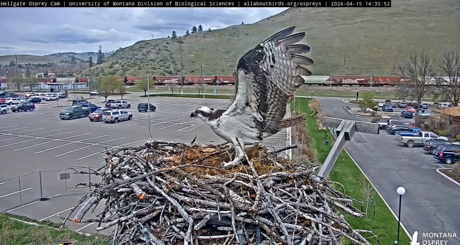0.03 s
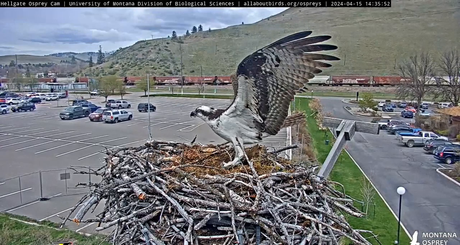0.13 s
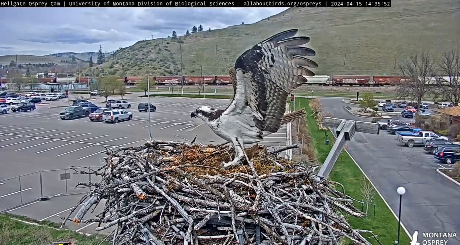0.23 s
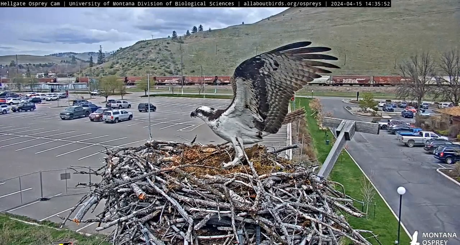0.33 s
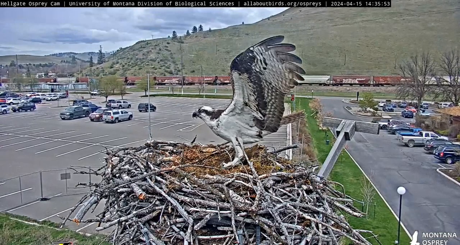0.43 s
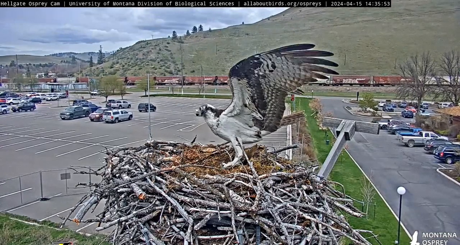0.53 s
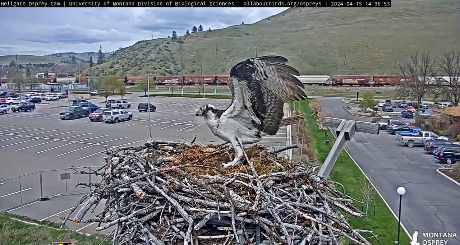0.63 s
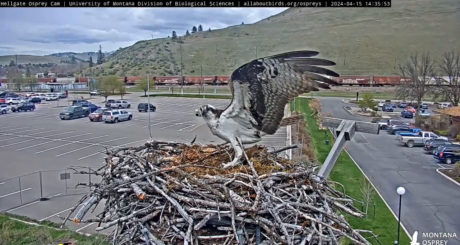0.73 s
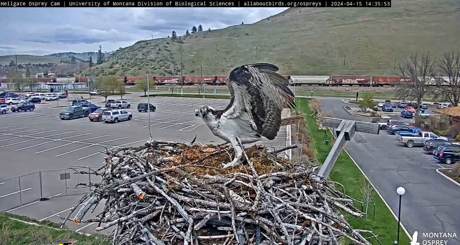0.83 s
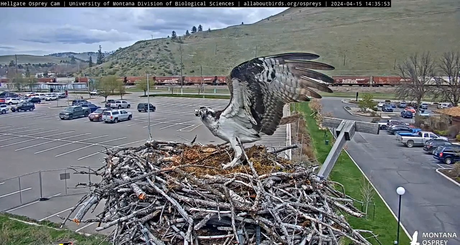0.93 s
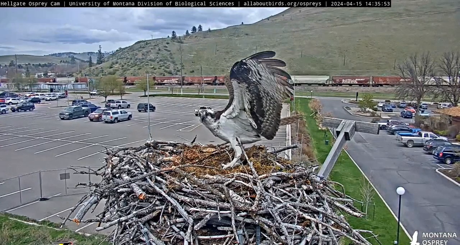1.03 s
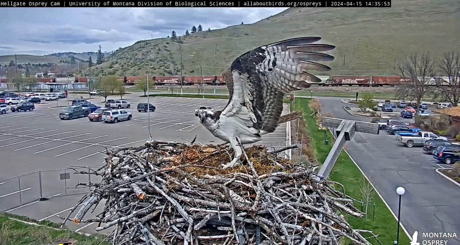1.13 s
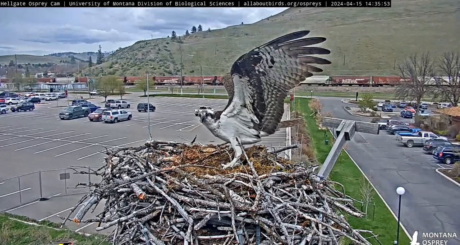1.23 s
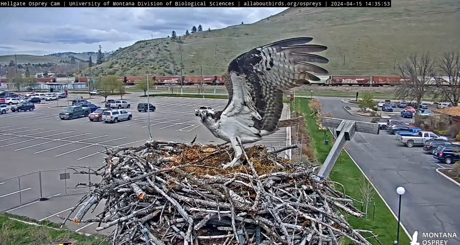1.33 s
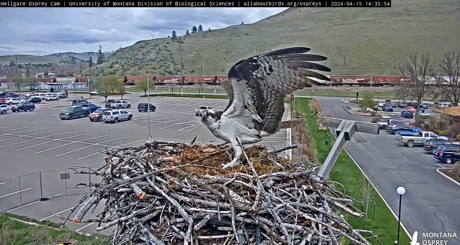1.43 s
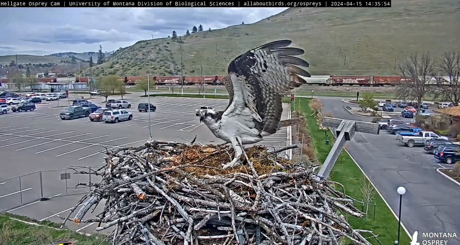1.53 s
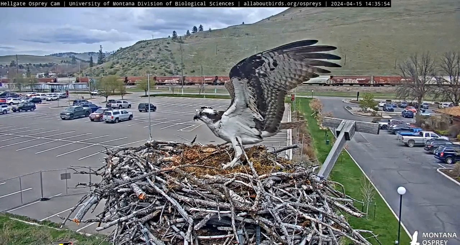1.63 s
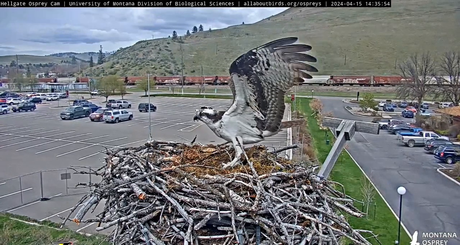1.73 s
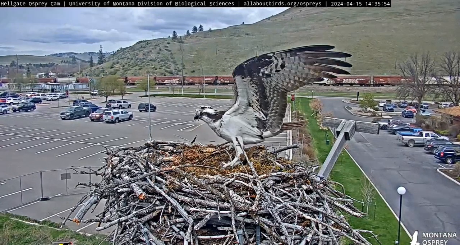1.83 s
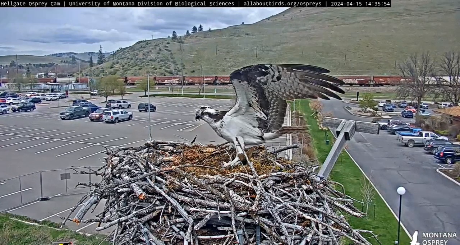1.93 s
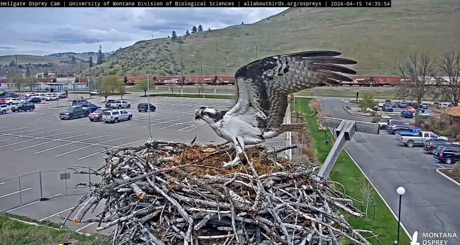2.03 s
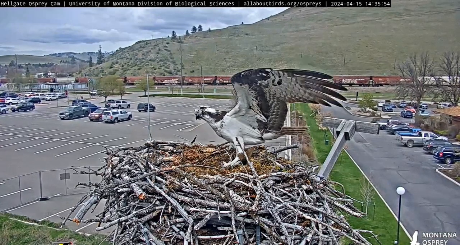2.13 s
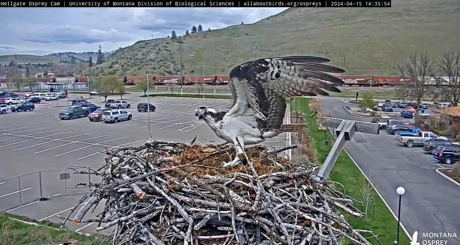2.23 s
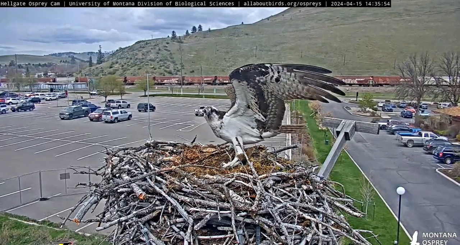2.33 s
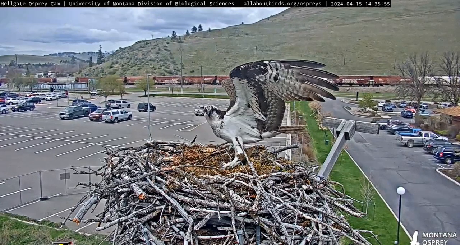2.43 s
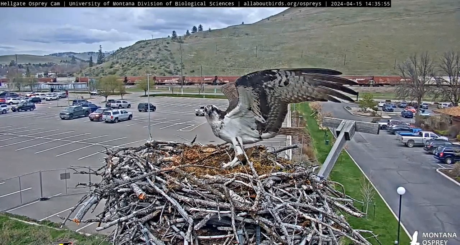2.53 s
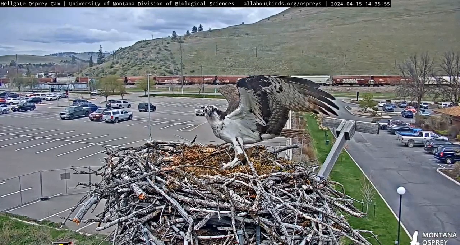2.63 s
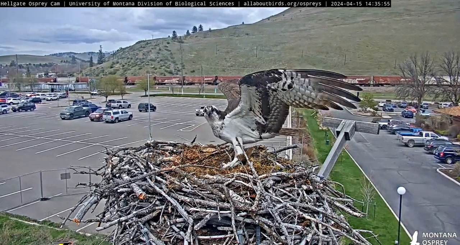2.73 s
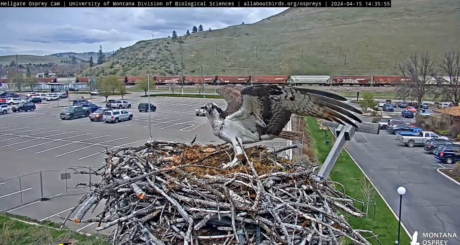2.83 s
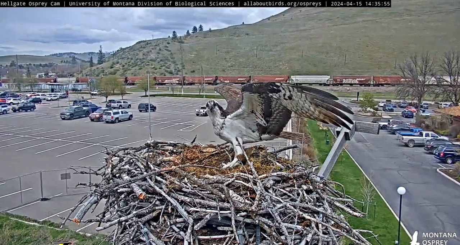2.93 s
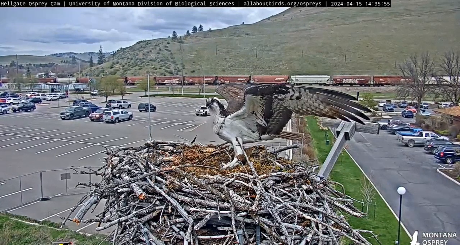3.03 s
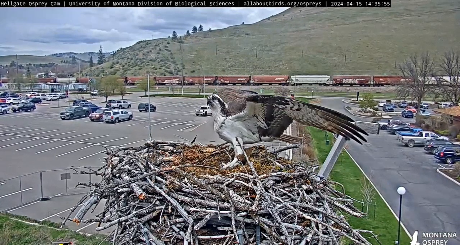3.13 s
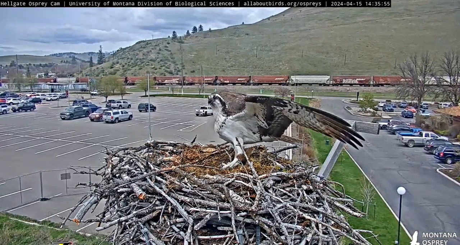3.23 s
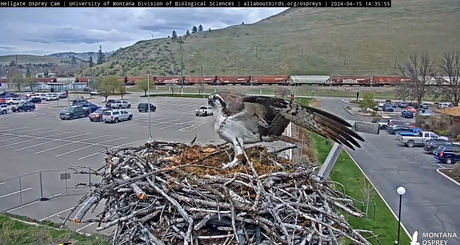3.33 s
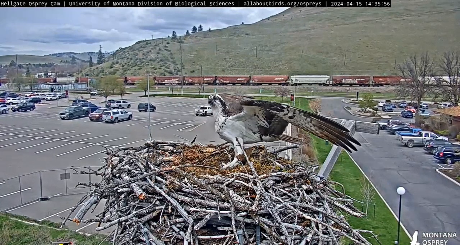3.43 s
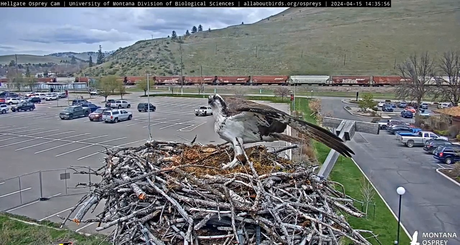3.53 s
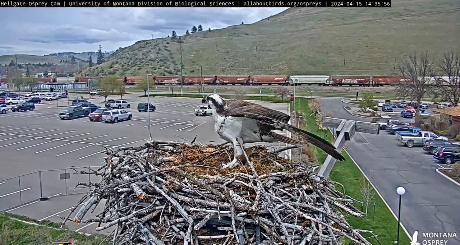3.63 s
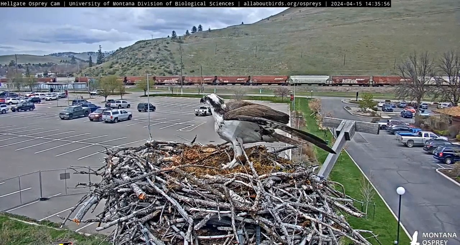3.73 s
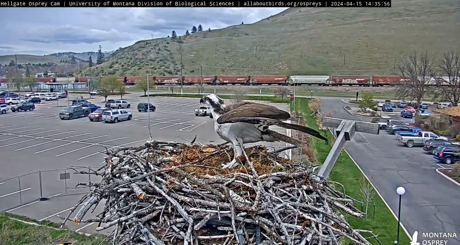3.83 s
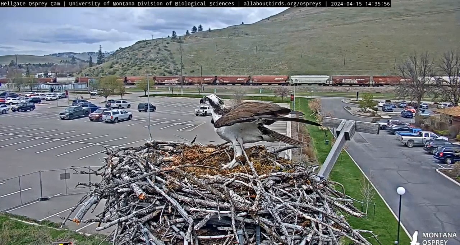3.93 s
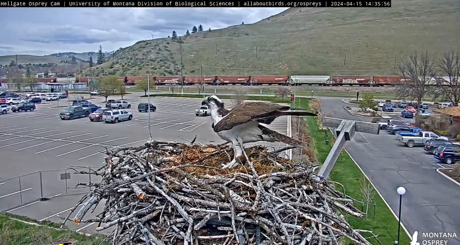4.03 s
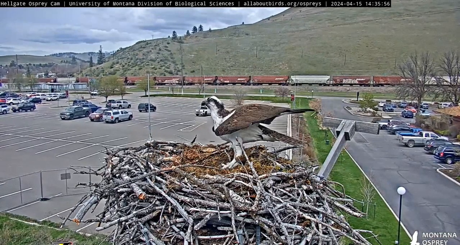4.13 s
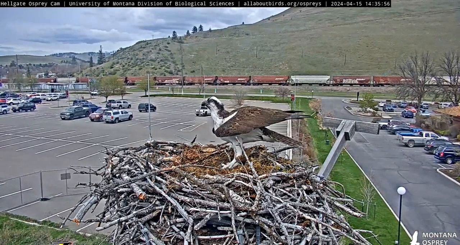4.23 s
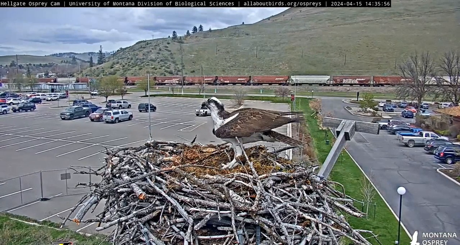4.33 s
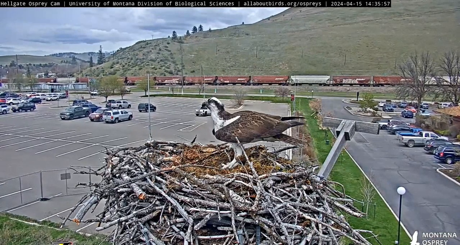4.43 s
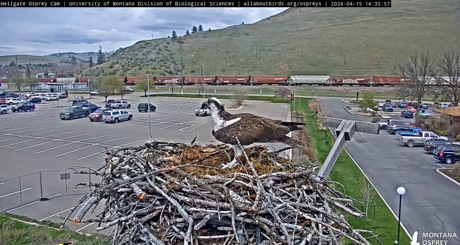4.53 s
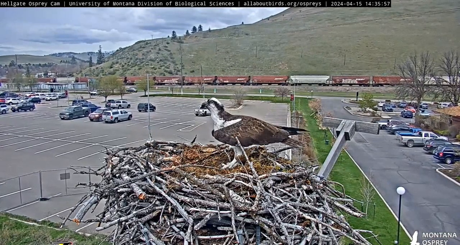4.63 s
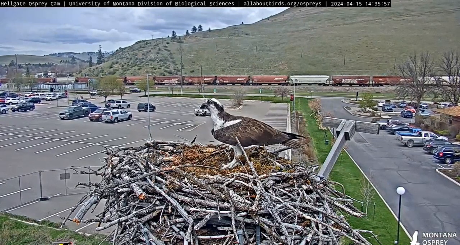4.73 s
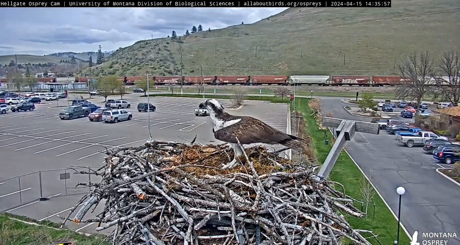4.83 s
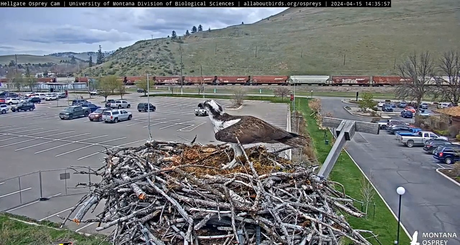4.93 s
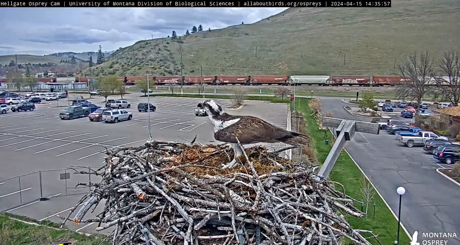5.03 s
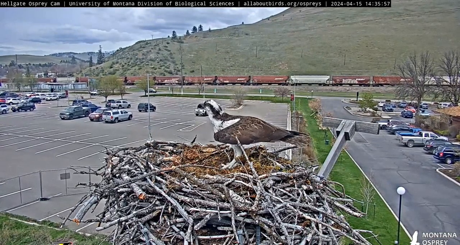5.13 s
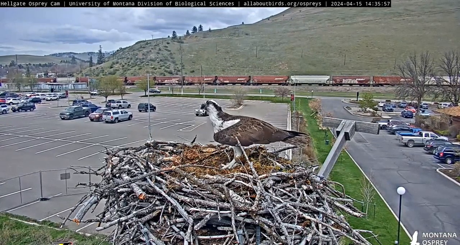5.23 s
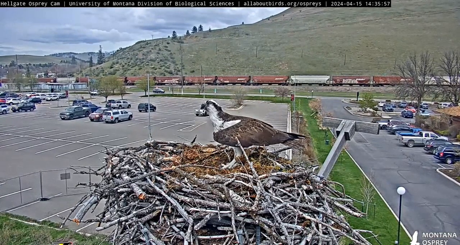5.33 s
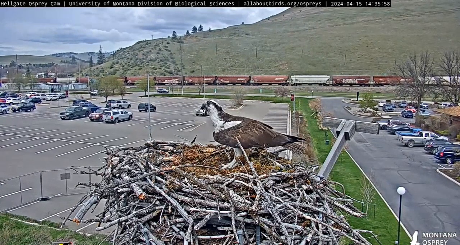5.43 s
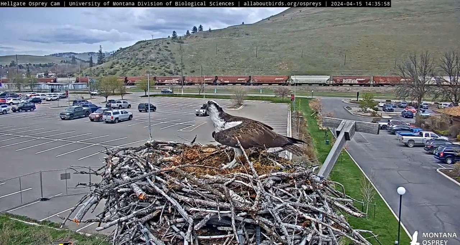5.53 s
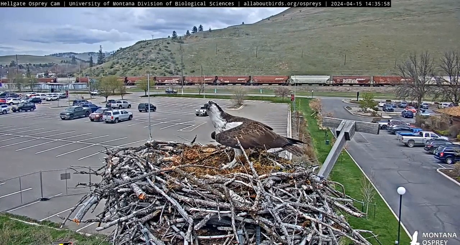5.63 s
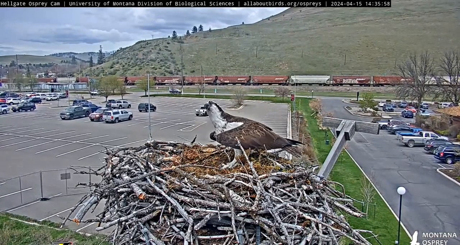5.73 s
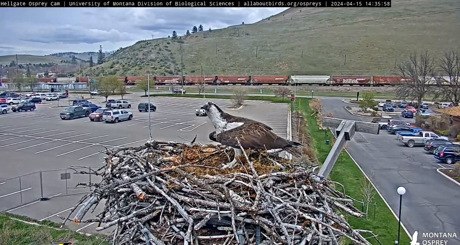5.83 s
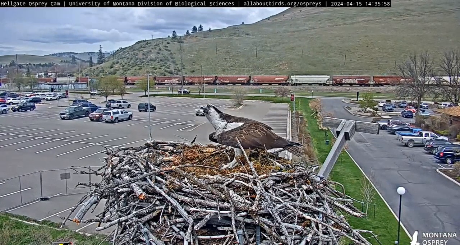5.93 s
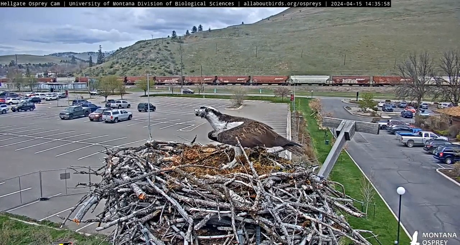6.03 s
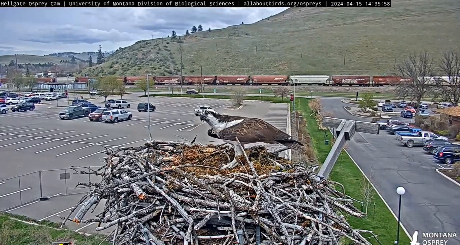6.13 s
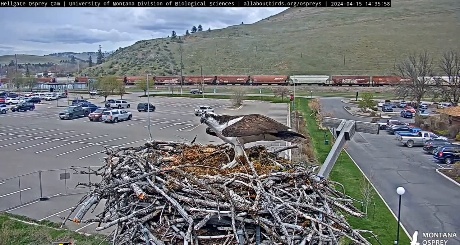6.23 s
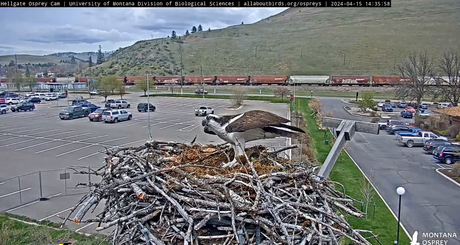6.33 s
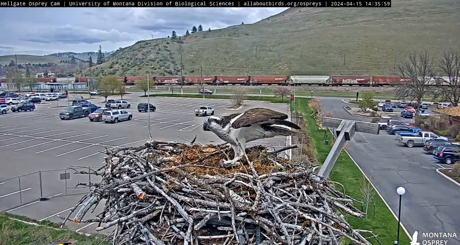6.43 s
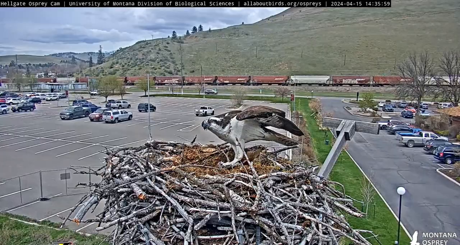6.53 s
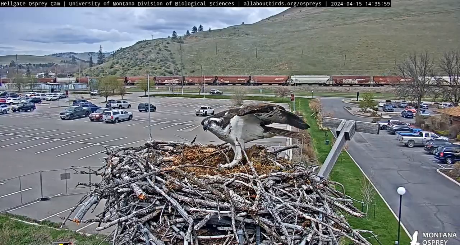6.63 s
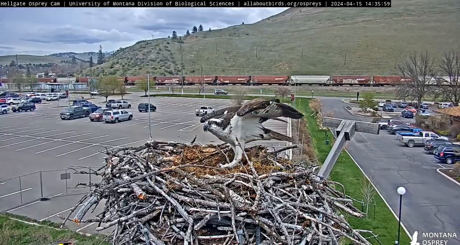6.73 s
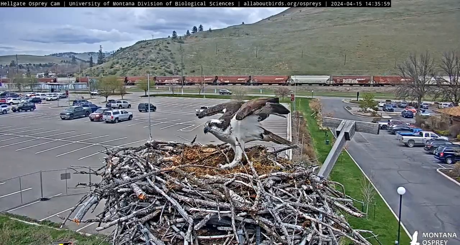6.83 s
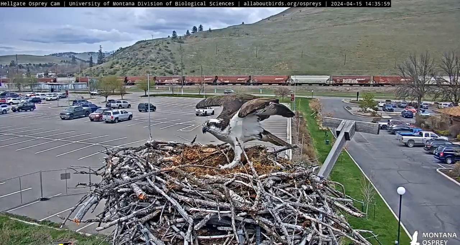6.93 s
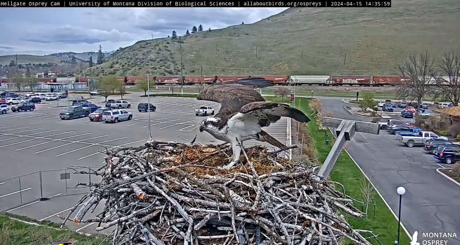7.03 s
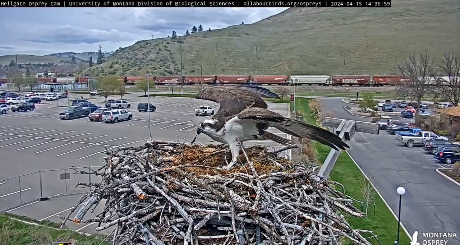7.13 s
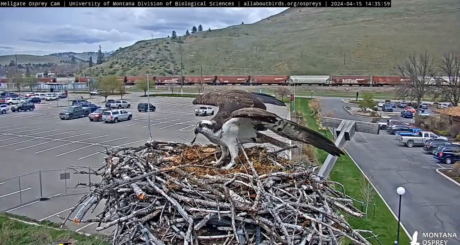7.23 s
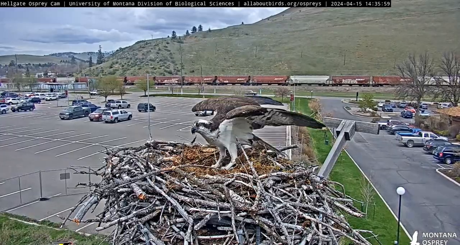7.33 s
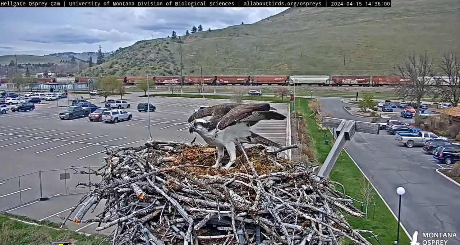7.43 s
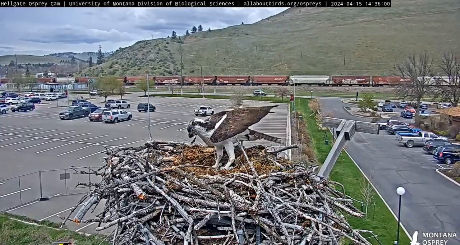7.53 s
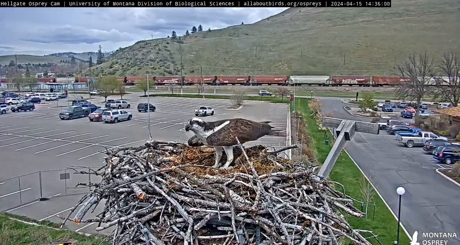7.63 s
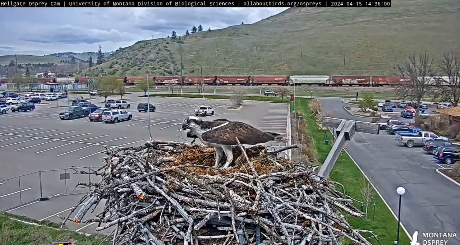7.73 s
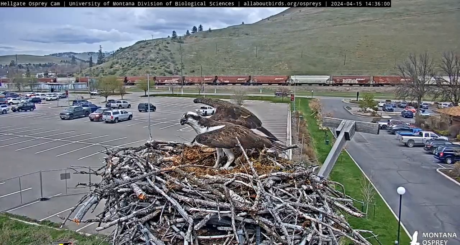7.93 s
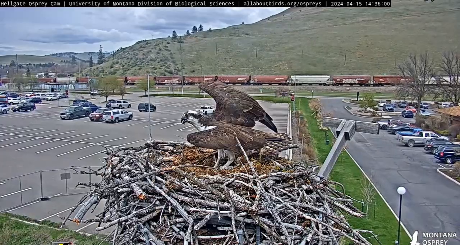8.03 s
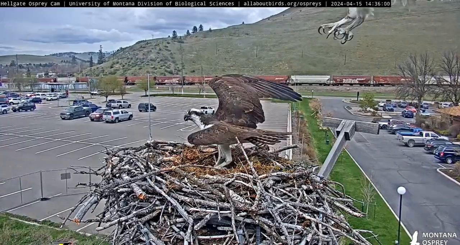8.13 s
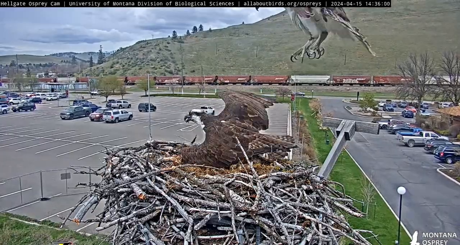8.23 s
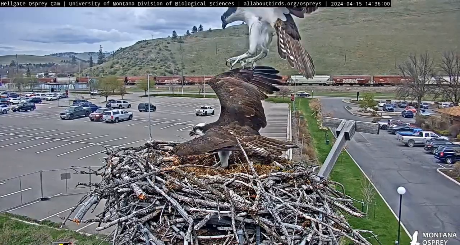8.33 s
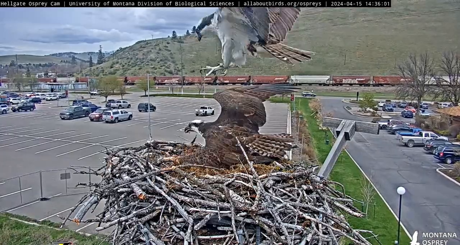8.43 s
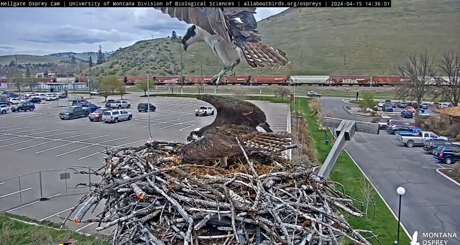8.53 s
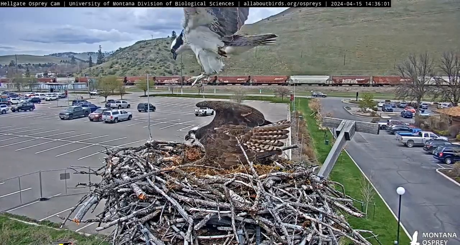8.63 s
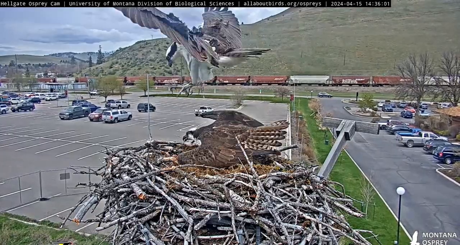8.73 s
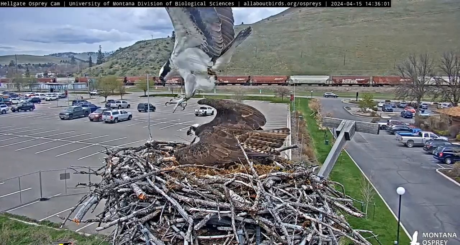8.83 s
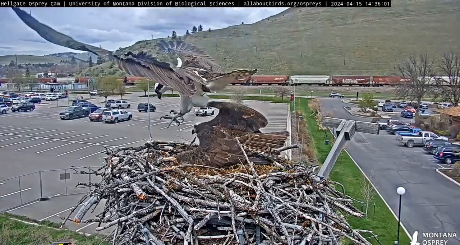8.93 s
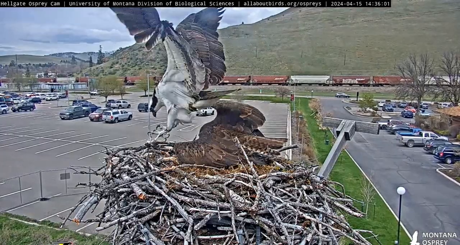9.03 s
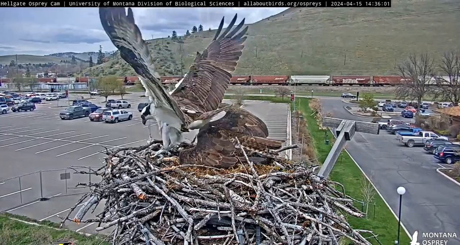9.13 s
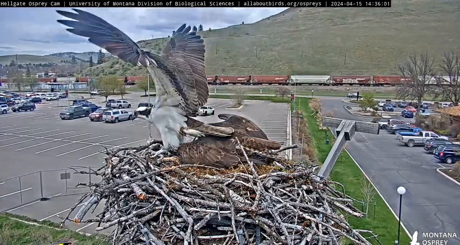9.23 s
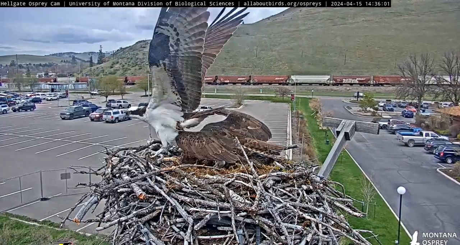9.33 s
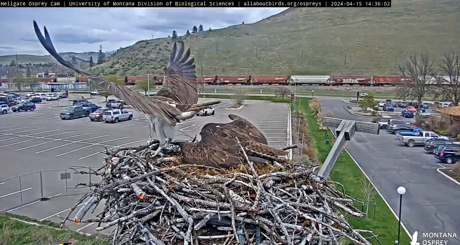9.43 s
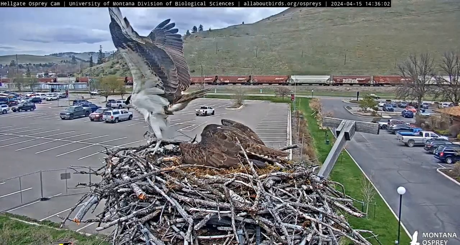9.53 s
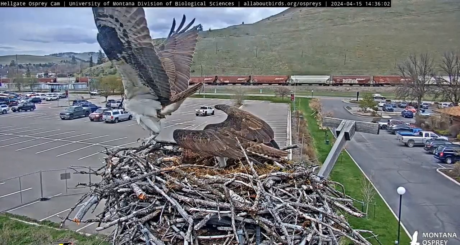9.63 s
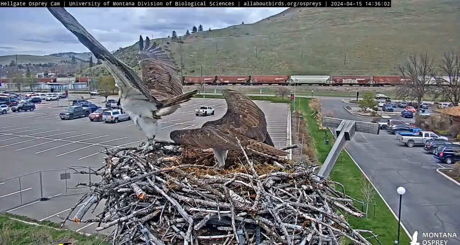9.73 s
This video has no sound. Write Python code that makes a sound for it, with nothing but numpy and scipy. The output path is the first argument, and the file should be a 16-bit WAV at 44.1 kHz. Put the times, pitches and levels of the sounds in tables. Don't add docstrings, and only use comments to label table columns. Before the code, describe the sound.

Outdoors at an osprey nest, a small close microphone catches uneven low wind buffeting over soft, steady distant town hiss. Short, soft, rounded whistled chirps sound at about 0.5, 1.25, 2.1 and 2.9 seconds, the last lower and weaker. The bird then pauses while gusts ebb and, from 4.5 seconds, swell into a stronger rumble and whoosh. A clearer chirp comes at 5.4 and a small one at 6.5, with a rough, wavering low hum in the wind from about 5.4 to 7.2. A bright pip at 6.8 leads to louder arched whistles at 7.1, faintly 7.4, and 7.6, climbing and plunging. From 7.8 to about 9.7 the calls run fast, roughly four a second: rising flicks, falling swoops, throbbing peeps and high voice cracks, dry and piercing, softening slightly near the end. Wind eases around 8 seconds, then gusts again from 8.8.

```python
import sys
import numpy as np
from scipy import signal
from scipy.fft import rfft, irfft
from scipy.io import wavfile
from scipy.ndimage import uniform_filter1d

SR = 44100
rng = np.random.default_rng(int(sys.argv[2]) if len(sys.argv) > 2 else 0)


def field_ratio(decibels):
    return 10 ** (np.asarray(decibels, dtype=float) / 20)


def wrap_up_sound(samples):
    columns = np.atleast_2d(samples).T
    tamed = np.clip(columns, -1, 1)
    steps = np.round(tamed * 32767).astype(np.int16)
    wavfile.write(sys.argv[1], SR, steps)


N = 429534

# start in seconds, length in seconds, first pitch in Hz, last pitch in Hz, level in dB.
CHIRPS = [
    (0.491, 0.074, 1854, 1817, -40),
    (1.2534, 0.066, 1894, 1820, -38.5),
    (2.101, 0.067, 1806, 1806, -41),
    (2.855, 0.062, 1744, 1710, -45.5),
    (5.358, 0.075, 1865, 1703, -37.5),
    (6.498, 0.056, 1863, 1723, -43),
]
# start in seconds, climb in seconds, first pitch in Hz, top pitch in Hz,
# plunge level in dB.
ARCHES = [
    (7.105, .036, 2920, 3925, -27.5),
    (7.363, 0.023, 3500, 4140, -43.5),
    (7.607, 0.033, 3670, 4700, -28.5),
]
# start in seconds, length in seconds, first pitch in Hz, middle pitch in Hz,
# effort in dB.
FLICKS = [ (7.838, 0.01, 3530, 4100, -34), (8.291, 0.03, 2570, 3600, -29.5),
          (8.504, 0.026, 2600, 3380, -25), (8.732, 0.025, 2810, 3720, -26.5),
          (8.983, 0.018, 3090, 3480, -24.5), (9.212, 0.018, 3060, 3520, -32),
          (9.459, 0.017, 2500, 3370, -30), (9.708, 0.012, 2980, 3290, -31)]
# start in seconds, length in seconds, first pitch in Hz,
# middle pitch in Hz, effort in dB.
SWOOPS = [ (8.5795, .015, 4900, 2980, -32), (8.827, .0195, 5400, 3100, -28),
          (9.070, .0175, 5300, 3120, -31), (9.305, .020, 5700, 3400, -31), (9.552, .014, 4600, 3200, -34)]
# seconds, seconds, Hz, Hz, dB.
DIPS = [(7.8745, .017, 4700, 3100, -34), (8.126, .015, 3500, 2760, -35), (8.3575, .0165, 4500, 2850, -31)]
# loudest moment in seconds, length in seconds,
# first pitch in Hz, last pitch in Hz, level in dB.
PIP = [(6.840, 0.019, 2326, 2280, -28.5)]
# seconds, seconds, Hz, Hz, dB.
PEEPS = [ (8.8685, 0.02, 2760, 2180, -26.5), (9.0950, 0.03, 2740, 2260, -26),
         (9.3440, 0.024, 2720, 2260, -37), (9.5745, 0.025, 2800, 2220, -36)]
# seconds, seconds, Hz, Hz, dB.
CRACKS = [ (8.8465, .006, 3500, 3400, -27), (8.8505, 0.011, 3870, 3550, -22),
          (8.861, .005, 3400, 3270, -29), (9.335, 0.013, 3620, 3500, -33.5),
          (9.567, 0.0073, 3800, 3650, -43), (7.8915, .004, 3650, 3700, -42), (8.371, .005, 3500, 3450, -42),
          (8.5945, .004, 3500, 3500, -43)]
# seconds, seconds, Hz, Hz, dB.
WARBLES = [ (7.8990, .031, 2560, 2500, -22), (8.1438, .024, 2540, 2420, -21.5),
           (8.3787, .030, 2540, 2500, -23), (8.6022, .038, 2600, 2220, -24.5)]
# seconds, seconds, Hz, Hz, dB.
TRILLS = [(7.1570, 0.032, 2640, 2560, -34), (7.4055, 0.021, 2620, 2560, -48),
          (7.6610, 0.015, 2600, 2520, -45)]

# pitch in Hz, gain in dB.
BEAK_RISING = [(2500, -13), (2800, 0.5), (3200, -11.5), (3600, -15.5), (4300, -36), (7000, -44)]
# pitch in Hz, gain in dB.
BEAK_FALLING = [(2500, -2), (2800, 0), (3450, -2), (3800, -9), (4100, -23), (4800, -30), (5700, -42)]
# pitch in Hz, gain in dB.
BEAK_HALF_SHUT = [(2500, -2), (2850, 1), (3100, -2), (3450, -12), (3800, -17), (4300, -28), (4800, -32)]
# pitch in Hz, gain in dB.
BEAK_CLIMB = [(3000, -33), (3500, -45), (3950, -47), (4400, -62.5), (4900, -56)]
# pitch in Hz, gain in dB.
BEAK_PLUNGE = [(2450, -8), (2600, -2), (2800, 4), (3100, -7), (3600, -14), (4300, -26)]
# pitch in Hz, level in dB.
GLIDE_OCTAVE = [(2700, -47), (3300, -35), (3900, -24)]
# pitch in Hz, level in dB.
ARCH_OCTAVE = [(3300, -51), (3950, -16)]

# start in seconds, length in seconds, first level in dB,
# last level in dB, whoosh above the buffet in dB.
GUSTS = [ (0.062, 0.11, -63, -57, -11), (.47, 0.15, -57, -66, -17), (0.767, 0.48, -53.5, -46.5, -12.5),
         (1.271, 0.26, -52, -45, -5.5), (1.637, 0.39, -46, -55, -10), (2.121, 0.21, -52.5, -47.5, -10.5),
         (2.405, 0.26, -48.5, -45.5, -6), (2.995, 0.69, -75, -55, -9), (3.719, 0.24, -55, -56, -14),
         (4.04, 0.45, -61, -75, -6), (4.466, 0.31, -71.5, -43.5, -6.5), (4.828, 0.62, -44.5, -52, -6),
         (5.467, 0.2, -42.5, -60, -9), (5.637, 0.287, -51, -43, -3), (5.934, 0.365, -43, -52.5, -4.5),
         (6.357, 0.44, -53.5, -51, -32), (6.736, .27, -47, -45.5, -6.5), (7.021, 0.39, -45, -62.5, -5.5),
         (7.54, .15, -57.5, -56.5, -22), (8.821, 0.24, -46, -48, -10), (9.057, 0.73, -46, -55.5, -8.5)]
# frequency in Hz, gain in dB.
BUFFET = [(22, -24.5), (48, -6), (76, -4), (119, 1), (178, -1.5), (240, -1), (330, -5), (450, -19)]
# frequency in Hz, gain in dB.
WHOOSH = [(250, -11), (340, 1), (480, 1), (650, -7), (900, -17)]
# time in seconds, shedding rate in Hz, level above the gust in dB.
EDDIES = [(5.4, 112, -15), (5.6, 107, -7.5), (5.75, 109.4, -18), (5.92, 132.9, -10.5), (6.081, 121.5, -6.5),
          (6.36, 111.3, -10), (6.6, 116, -8), (6.82, 118.1, -14.5), (7.2, 105, -18)]
# multiple of the shedding rate, level in dB.
EDDY_HARMONICS = [(1, 3.5), (2, 7.5), (3, 2.5), (4, -3), (5, -16.5)]
# frequency
# in Hz, gain in dB.
TOWN_HISS = [(18, -37), (30, -5.5), (63, 3.5), (161, 0), (199, -5), (258, -8), (532, -5), (889, -1),
             (2110, -9), (2730, -2.5), (3220, -15.5), (3880, -20), (4900, -23.5), (7460, -25),
             (8000, -25.5), (10400, -57), (17600, -120)]

# frequency in Hz, gain in dB.
MIRROR = [(8000, -9.5), (9500, -13), (11000, -15), (12300, -18), (13300, -18.5), (14100, -23),
          (15000, -27.5), (15450, -35)]
SAMPLING_HZ = 16000
# frequency in Hz, gain in dB.
MIC_RANGE = [(10, -30), (45, 0), (SAMPLING_HZ / 2, 0)]


def osprey():
    flick_end_hz, swoop_end_hz = 6500, 2570
    glides = sweeps(FLICKS, flick_end_hz, BEAK_RISING, rise_s=.006, fall_s=.004, octave_db=24)
    glides += sweeps(SWOOPS, swoop_end_hz, BEAK_FALLING, rise_s=.002, fall_s=.0045, octave_db=35)
    glides += sweeps(DIPS, swoop_end_hz, BEAK_HALF_SHUT, rise_s=.002, fall_s=.0035, octave_db=26)

    plain = peeps(PIP, rise=.5, fall=.5, warble=0, throb_db=0, overtones_db=-38)
    plain += peeps(PEEPS, rise=.8, fall=2.0, warble=.01, throb_db=1, overtones_db=-28)
    plain += peeps(CRACKS, rise=1.0, fall=2.2, warble=.02, throb_db=0, overtones_db=-48)
    warbled = peeps(WARBLES, rise=2.6, fall=4.0, warble=.05, throb_db=9.5, overtones_db=-33)
    warbled *= field_ratio(.8 * walk(260))
    trilled = peeps(TRILLS, rise=.4, fall=1.7, warble=.1, throb_db=32, overtones_db=-54)
    trilled *= field_ratio(3 * walk(220))

    strain = field_ratio(1.6 * walk(500))
    return chirps() + arches() + strain * (glides + trilled + windpipe(plain + warbled))


def chirps():
    arch_hz, drop_hz = 92, 210
    attack_s, crest = 0.0044, 0.68
    swell_db, release_db = 10, 17
    octave_db, octave_ceiling_db = -7, -48.5
    out = np.zeros(N)
    for start, length, first, last, db in CHIRPS:
        u = np.linspace(0, 1, int(length * SR))
        hz = first + (last - first) * u + arch_hz * 4 * u * (1 - u) - drop_hz * u ** 7
        off_crest = (u - crest) / np.where(u < crest, crest, 1 - crest)
        level_db = db - np.where(off_crest < 0, swell_db, release_db) * off_crest ** 2
        gate = np.clip(np.minimum(u, 3 * (1 - u)) * length / attack_s, 0, 1)
        octave = min(octave_db, octave_ceiling_db - db) - 14 * u ** 5
        add_whistle(out, start, hz, field_ratio(level_db) * gate, [octave, octave - 29, octave - 26.5])
    return out


def arches():
    crest, climb_effort = .68, 0.19
    plunge_s, aim_hz, stop_hz = 0.0072, 2220, 2377
    out = np.zeros(N)
    for start, climb_s, first, top, db in ARCHES:
        u = np.linspace(0, 1, int(climb_s * SR))
        climb = first + (top - first) * np.sin(np.pi / 2 * u / crest)
        height = climb[-1] - aim_hz
        t = np.arange(0, plunge_s * np.log(height / (stop_hz - aim_hz)), 1 / SR)
        plunge = aim_hz + height * np.exp(-t / plunge_s)
        hz = uniform_filter1d(np.r_[climb, plunge], size=130, mode="nearest")
        plunging = uniform_filter1d(np.r_[0 * u, 1 + 0 * t], size=260, mode="nearest")
        climb_gain = field_ratio(climb_effort * db + read(BEAK_CLIMB, hz))
        plunge_gain = field_ratio(db + read(BEAK_PLUNGE, hz))
        gain = (1 - plunging) * climb_gain + plunging * plunge_gain
        add_whistle(out, start, hz, gain * signal.windows.tukey(len(hz), .16), [read(ARCH_OCTAVE, hz)])
    return out


def sweeps(table, last, beak, rise_s, fall_s, octave_db):
    out = np.zeros(N)
    for start, length, first, middle, db in table:
        u = np.linspace(0, 1, int(length * SR))
        low, high = min(first, last), max(first, last)
        bend = -np.log2((middle - low) / (high - low))
        hz = low + (high - low) * (u if last > first else 1 - u) ** bend
        ramp = np.minimum(u * length / rise_s, (1 - u) * length / fall_s)
        gate = np.sin(np.pi / 2 * np.clip(ramp, 0, 1)) ** 2
        gain = field_ratio(db + read(beak, hz)) * gate
        add_whistle(out, start, hz, gain, [octave_db + db + read(GLIDE_OCTAVE, hz)])
    return out


WARBLE_HZ, LEAK_DB = 243, -13


def peeps(table, rise, fall, warble, throb_db, overtones_db):
    lead = .5
    out = np.zeros(N)
    for loudest, length, first, last, db in table:
        u = np.linspace(0, 1, int(length * SR))
        top = rise / (rise + fall)
        swell = (u / top) ** rise * ((1 - u) / (1 - top)) ** fall
        turn = 2 * np.pi * WARBLE_HZ * (u - top) * length
        swing = warble * (.4 + .6 * swell) * np.cos(turn + lead)
        hz = (first + (last - first) * u) * (1 + swing)
        choke_db = -throb_db * ((1 - np.cos(turn)) / 2) ** 2
        bright_db = overtones_db - LEAK_DB - 10 * (1 - swell) - choke_db
        gain = field_ratio(db + choke_db) * swell
        add_whistle(out, loudest - top * length, hz, gain, [bright_db, bright_db - 4])
    return out


def windpipe(x):
    centre_hz, width_hz = 2720, 320
    b, a = signal.iirpeak(centre_hz, centre_hz / width_hz, fs=SR)
    return signal.lfilter(b, a, x) + field_ratio(LEAK_DB) * x


def add_whistle(out, start, hz, gain, overtones_db):
    phase = 2 * np.pi * np.cumsum(hz) / SR
    tone = np.sin(phase)
    for k, db in enumerate(overtones_db):
        tone = tone + field_ratio(db) * np.sin((k + 2) * phase)
    i = int(start * SR)
    out[i:i + len(hz)] += (np.sqrt(2) * gain * tone)[:N - i]


def wind():
    attack_s, release_s, calm_db = 0.062, 0.11, -72.5
    t = np.arange(N) / SR
    buffet, whoosh = np.full(N, field_ratio(calm_db)), np.zeros(N)
    for start, length, first_db, last_db, whoosh_db in GUSTS:
        u = (t - start) / length
        edge = np.clip(np.minimum(u / attack_s, (1 - u) / release_s) * length + .5, 0, 1)
        gust = edge * field_ratio(first_db + (last_db - first_db) * np.clip(u, 0, 1))
        buffet += gust
        whoosh += gust * field_ratio(whoosh_db)
    flutter = field_ratio(1.34 * walk(12) + 0.46 * walk(25))
    rumble = noise(BUFFET) * buffet * field_ratio(0.19 * walk(41))
    rush = noise(WHOOSH) * whoosh * field_ratio(1.9 * walk(15))
    seconds, _, eddy_db = np.transpose(EDDIES)
    humming = np.clip(np.minimum(t - seconds[0], seconds[-1] - t) / 0.21, 0, 1)
    hum = humming * buffet * field_ratio(np.interp(t, seconds, eddy_db)) * mount_eddies(t)
    return flutter * (rumble + rush) * field_ratio(-4 * humming) + hum


def mount_eddies(t):
    bright = 0.19
    seconds, shedding, _ = np.transpose(EDDIES)
    hz = np.interp(t, seconds, shedding)
    phase = 2 * np.pi * np.cumsum(hz * (1 + .015 * walk(9) + .02 * walk(30))) / SR
    out = np.zeros(N)
    for k, db in EDDY_HARMONICS:
        level_db = db + bright * (k - 2) * (hz - 118) + 3.5 * walk(12)
        out += field_ratio(level_db) * np.sin(k * phase)
    return out


def town():
    hum_hz, hum_db, swell_db = 210, -70, 6.5
    passes_s, lasts_s = 7.9, .45
    t = np.arange(N) / SR
    swell = swell_db * np.exp(-((t - passes_s) / lasts_s) ** 4)
    hum = field_ratio(hum_db + swell + 1.8 * walk(3.82)) * np.sin(2 * np.pi * hum_hz * t + 0.43 * walk(3.1))
    return noise(TOWN_HISS) * field_ratio(-56.5 + .5 * walk(1.67)) + hum


def read(table, hz):
    f, db = np.transpose(table)
    return np.interp(np.log(np.maximum(hz, 1)), np.log(f), db)


def colour(x, table):
    hz = np.arange(N // 2 + 1) * SR / N
    inside = (hz > table[0][0]) & (hz < table[-1][0])
    return irfft(rfft(x) * field_ratio(read(table, hz)) * inside, N)


def noise(table):
    x = colour(rng.standard_normal(N), table)
    return x / np.std(x)


def walk(rate):
    k = int(SR / rate)
    steps = np.repeat(rng.standard_normal(N // k + 1), k)
    return 1.5 * uniform_filter1d(uniform_filter1d(steps, k), k)[:N]


def scene():
    return (osprey() + wind() + town())[None]


def low_pass(x):
    return signal.sosfilt(signal.butter(12, 15330, fs=SR, output="sos"), x)


def record(dry):
    kept = colour(dry[0], MIC_RANGE)
    carrier = np.cos(2 * np.pi * SAMPLING_HZ * np.arange(N) / SR)
    mirror = colour(2 * kept * carrier, MIRROR)
    return low_pass((kept + mirror)[None])


dry = scene()
out = record(dry)
wrap_up_sound(out)
```